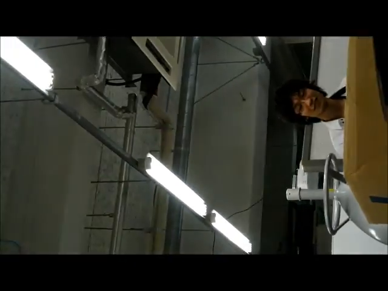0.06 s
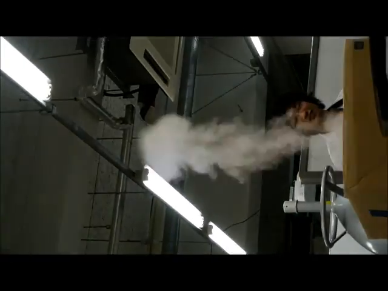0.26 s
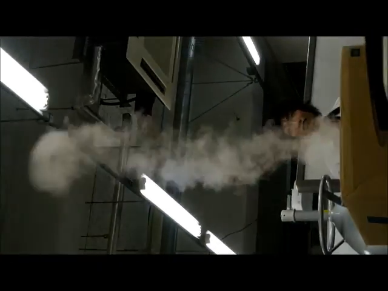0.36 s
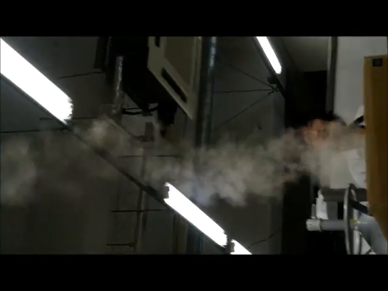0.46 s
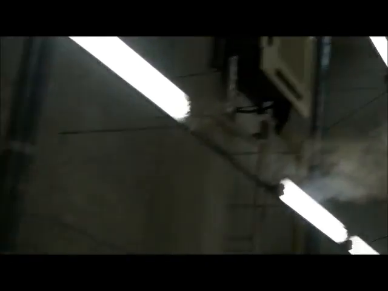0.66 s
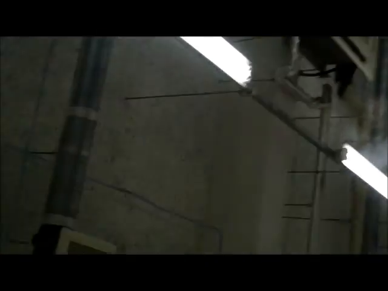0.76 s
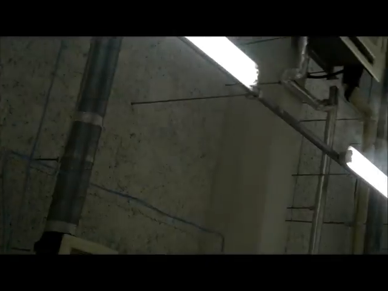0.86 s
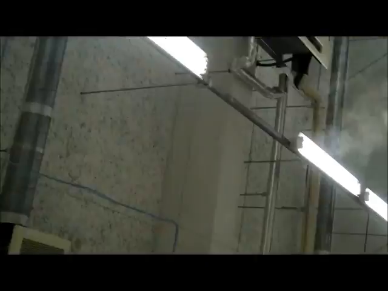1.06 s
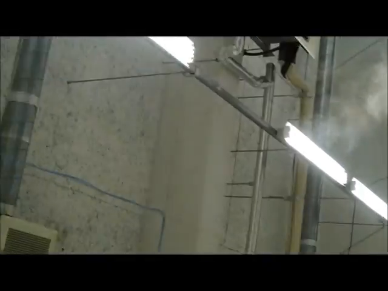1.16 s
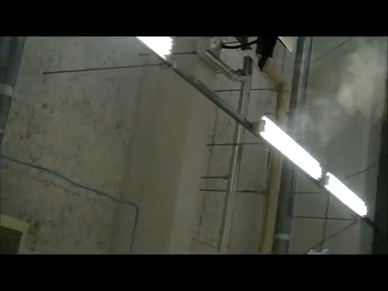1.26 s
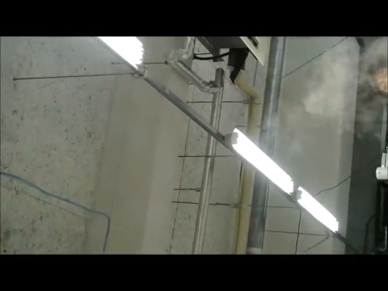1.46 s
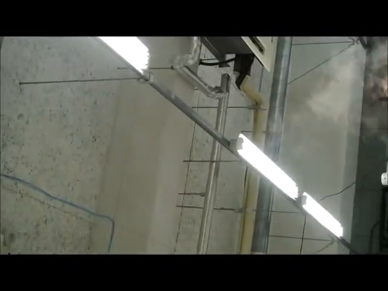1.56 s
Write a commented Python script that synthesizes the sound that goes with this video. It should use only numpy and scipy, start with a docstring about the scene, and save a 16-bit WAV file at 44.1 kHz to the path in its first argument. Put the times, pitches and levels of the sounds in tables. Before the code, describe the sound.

One violent, distorted air blast booms in a concrete workshop, then faint ticks and debris rattles

```python
"""Ventilation hums and hisses throughout a workshop, made from coloured noise; an early hiss soon fades.
An air cannon fires a puff of smoke close to a microphone whose input clips: air spits from the muzzle as
noise bursts and the barrel thumps as short sine waves. The hall rings as fading noise, with its low reverberation
drawn as one uneven tone. A small thing ticks, a few short sine waves at a time, then light debris rattles down
in bright noise bursts. A thin high hiss swells near the end."""
import sys
import numpy as np
from scipy import signal
from scipy.fft import rfft, irfft, next_fast_len
from scipy.io import wavfile
from scipy.ndimage import uniform_filter1d

SR = 44100
rng = np.random.default_rng(int(sys.argv[2]) if len(sys.argv) > 2 else 0)


def transcribe(signal):
    """Save signal, clipped to [-1, 1], as a 16-bit WAV file at the path in sys.argv[1]."""
    frames = np.atleast_2d(signal).T
    limited = np.clip(frames, -1, 1)
    pcm = np.round(limited * 32767).astype(np.int16)
    wavfile.write(sys.argv[1], SR, pcm)


N = 70560  # length in samples

# How alike left and right are for sounds close by: pitch_hz [Hz], likeness [-1 to 1]
NEAR_ALIKE = [(400, 0.69), (1290, 0.89), (2380, 0.35), (4400, -0.082), (8120, -0.54), (15000, 0.11)]
TAIL_START_S = 0.23  # the hall starts to answer
PATCHES_DB = 1.3  # rms unevenness of the fading room sound


def amp(db):
    """Turn decibels into a gain."""
    return 10 ** (np.asarray(db) / 20)


def unit(x):
    """Scale a sound to an rms (average strength) of 1."""
    return x / np.sqrt(np.mean(np.abs(x) ** 2) + 1e-20)


def along(points, hz):
    """Read a curve of (Hz, value) points, with pitch on a log scale."""
    f, v = np.transpose(points)
    return np.interp(np.log(hz + 1), np.log(f + 1), v)


def since(start_s):
    """Seconds since start_s (0 before it), and a switch that is on from then."""
    t = np.arange(N) / SR - start_s
    return np.maximum(t, 0), t >= 0


def level_over_time(points):
    """Gain at every sample from (s, dB) points."""
    return amp(np.interp(np.arange(N) / SR, *np.transpose(points)))


def filtered(x, response):
    """Shape the frequencies of x with a gain that depends on Hz."""
    m = next_fast_len(N + SR // 2)  # spare room so that the end does not wrap round to the start
    return irfft(rfft(x, m) * response(np.fft.rfftfreq(m, 1 / SR)), m)[..., :N]


def bands(peaks):
    """Gain of a set of resonances, each letting through a band around its own pitch."""
    def response(f):
        total = 0
        for k, (center, width, db) in enumerate(peaks):
            resonance = 1j * f * width / (center * center - f * f + 1j * f * width)
            total = total + (-1) ** k * amp(db) * resonance
        return total
    return response


def diffuse(response, alike=None):
    """Coloured stereo noise of rms 1: a shared middle and an opposite side set how alike the ears are."""
    # Usual left-right likeness, strong in the bass and weak in the treble: pitch_hz [Hz], likeness [-1 to 1]
    usual_alike = [(60, 0.83), (200, 0.87), (640, 0.64), (1400, 0.38), (3000, 0.057), (6500, -0.063),
                   (15000, 0.16)]
    if alike is None:
        alike = usual_alike

    def middle_and_side(hz):
        turn = np.arccos(np.clip(along(alike, hz), -1, 1)) / 2
        return response(hz) * [np.cos(turn), np.sin(turn)]

    mid, side = filtered(rng.standard_normal((2, N)), middle_and_side)
    return unit(np.array([mid + side, mid - side]))


def dying(x, start_s, share, patchy_db):
    """Fade each frequency of x at a share of the hall's fading time, in patches of random gain."""
    # The hall's time to fade by 60 dB, before the share: pitch_hz [Hz], t60_s [s]
    hall_t60 = [(100, 1.73), (400, 0.93), (1000, 1.006), (3000, 0.99), (6000, 0.87), (10000, 0.76),
                (15000, 0.56)]
    hz, t, z = signal.stft(x, SR, nperseg=256)
    fade_db = -60 * np.maximum(t - start_s, 0) / (share * along(hall_t60, hz)[:, None])
    field = rng.standard_normal(fade_db.shape)
    field = uniform_filter1d(field, size=12, axis=0)  # smooth across pitch
    field = uniform_filter1d(field, size=3, axis=1)  # smooth across time
    return signal.istft(z * amp(fade_db + patchy_db * unit(field)), SR, nperseg=256)[1][:, :N]


def ventilation():
    """Moving air makes broad noise; the fans hum as noise squeezed into narrow bands."""
    # Colour of the air noise: pitch_hz [Hz], relative level_db [dB per Hz]
    air_colour = [(25, 5), (50, 12.5), (80, 4.5), (129, -8), (210, -1.5), (291, -11.5), (400, -7.5),
                  (635, -10.5), (1150, -11.5), (2200, -14), (4300, -15), (8000, -16), (11500, -17),
                  (14000, -17), (15800, -24)]
    # Bands of the fans: pitch_hz [Hz], width_hz [Hz], relative level_db [dB]
    fan_bands = [(258, 32, -11), (418.5, 27, -15), (688, 8.6, -9.5)]
    air = diffuse(lambda hz: amp(along(air_colour, hz)))
    hum = diffuse(bands(fan_bands))
    return amp(-43) * air + amp(-53) * hum


def fading_hiss():
    """Coloured noise that dies away early, with a slight rise on the way."""
    # Level of the hiss: time_s [s], level_db [dB]
    hiss_level = [(0, -41.5), (.05, -48.5), (.1, -57), (.2, -53.5), (.5, -70)]
    # Colour of the hiss: pitch_hz [Hz], relative level_db [dB per Hz]
    hiss_colour = [(1000, -9), (4000, -6.5), (7000, 2.5), (9500, 2), (12500, -2), (14000, -24),
                   (15800, -36)]
    return level_over_time(hiss_level) * diffuse(lambda hz: amp(along(hiss_colour, hz)))


def muzzle_spits():
    """Turbulent air bursts out of the muzzle: noise that starts at once and fades."""
    # Air bursts: start_s [s], level_db [dB], t60_s (time to fade by 60 dB) [s], treble_lift_db [dB]
    air_bursts = [(0.2186, -20.5, 0.0097, 3), (0.2208, -1.5, 0.05, 2.5), (0.2234, 10, 0.018, -4.5),
                  (0.2264, -4, 0.0022, -5), (0.2298, -2.5, 0.019, 14), (0.2304, -1.5, 0.0098, 2.5),
                  (0.234, -16.5, 0.036, 6), (.2505, -12, 0.047, 40), (0.261, -25, 0.0095, 5)]
    # Colour before the treble lift: pitch_hz [Hz], relative level_db [dB per Hz]
    spit_colour = [(200, 5.5), (600, -36), (1500, -1), (2600, -1), (4000, -19), (8000, -18), (15000, -17)]
    out = np.zeros((2, N))
    for start_s, db, t60, lift_db in air_bursts:
        t, _ = since(start_s)
        air = diffuse(lambda hz: amp(along(spit_colour, hz) + lift_db * (hz > 4000)), NEAR_ALIKE)
        out += air * amp(db - 60 * t / t60) * np.minimum(t / 0.00015, 1)
    return out


def barrel_thump():
    """The air column in the barrel swings a few times, while its higher modes ring and fade."""
    # Swings, direct and off a wall: start_s [s], pitch_hz [Hz], level_db before sag and edges [dB], length_s [s]
    swings = [(.2206, 220, 14, .0112), (.2377, 192, 0, .016)]
    # Higher modes of the barrel: pitch_hz [Hz], level_db [dB], t60_s [s]
    barrel_modes = [(375, 1, 0.048), (577, -3, 0.048), (830, -14.5, 0.056), (948, -6.5, 0.039)]
    sag_db = 12.5  # loss over one swing's length
    rise_s, release_s = 0.0023, 0.0014
    out = np.zeros(N)
    for start_s, hz, db, length in swings:
        t, on = since(start_s)
        edge = np.clip((length - t) / release_s, 0, 1) * np.minimum(t / rise_s, 1)
        out -= on * edge * amp(db - sag_db * t / length) * np.sin(2 * np.pi * hz * t)
    t, _ = since(swings[0][0])
    for hz, db, t60 in barrel_modes:
        out -= amp(db - 60 * t / t60) * np.sin(2 * np.pi * hz * t)
    return out


def hall_tail():
    """The hall answers the shot with wide noise whose pitches fade at different speeds, in patches."""
    # Colour of the hall's answer: pitch_hz [Hz], relative level_db [dB per Hz]
    tail_colour = [(40, -12), (100, -15.5), (150, -11.5), (230, -2.5), (300, -16.5), (380, -10), (500, -20),
                   (700, -14.5), (1000, -18), (1500, -21), (2800, -23), (3900, -26), (8000, -24.5),
                   (13500, -23), (15800, -27)]
    # Level over the plain fade: time_s [s], level_db [dB]
    tail_swell = [(.232, 5), (.262, -2), (.36, 0), (.44, 3), (.53, 3), (.57, -1.5), (.7, 1)]
    t, _ = since(TAIL_START_S)
    noise = diffuse(lambda hz: amp(along(tail_colour, hz)))
    tail = dying(noise, TAIL_START_S, 0.93, PATCHES_DB)
    tail = tail * (1 - np.exp(-t / 0.0039))  # soft start
    return amp(-17.5) * level_over_time(tail_swell) * tail


def low_reverberation():
    """The hall's low reverberation: one uneven tone on set pitch and level curves, and fading room modes."""
    # Curves of the tone, around 190-245 Hz: time_s [s], pitch_hz [Hz], level_db before the left-right tilt [dB]
    tone_curves = [(.258, 218, -41), (.288, 225.5, -30), (0.304, 214.8, -33), (.32, 204.4, -21.5),
                   (.335, 214.6, -35), (.352, 228.2, -21), (.372, 205.5, -33), (.39, 192, -27),
                   (.42, 190.4, -27), (.44, 206, -15.5), (0.456, 210.4, -35), (.467, 214, -26),
                   (0.491, 235, -37.5), (0.521, 245, -24.5), (.54, 195, -33), (.56, 191, -38),
                   (.6, 203.8, -34.5), (.625, 225.5, -48), (.648, 228.2, -31), (.67, 232, -55)]
    # Modes around the tone: pitch_hz [Hz], level_db before the left-right tilt [dB], t60_s [s]
    room_modes = [(130.2, -35.5, 1.46), (153.7, -35.5, 1.27), (283, -30.5, 1.16), (351, -37, .8),
                  (563, -37, 0.7)]
    rough_share, spread_hz = 0.3, 60  # neighbouring modes
    t, on = since(TAIL_START_S)
    clock = np.arange(N) / SR
    s, hz, db = np.transpose(tone_curves)
    level_db = np.interp(clock, np.r_[s[0] - .012, s, s[-1] + .1], np.r_[-60, db, -70])
    slow_noise = filtered(rng.standard_normal((2, N)), lambda f: np.exp(-(f / spread_hz) ** 2))
    a, b = rough_share * unit(slow_noise)
    turn = 2 * np.pi * np.cumsum(np.interp(clock, s, hz)) / SR
    tone = unit((1 + a) * np.sin(turn) + b * np.cos(turn))
    modes = np.zeros(N)
    for f, mode_db, t60 in room_modes:
        modes += amp(mode_db - 60 * t / t60) * np.sin(2 * np.pi * (f * t + rng.random()))
    tilt = amp([[-.6], [.6]])  # right a little louder
    return (on * amp(level_db) * tone + modes * np.minimum(t / 0.047, 1)) * tilt


def ticks():
    """Small dry knocks of a hard object: a few of its modes ring as quickly fading sine waves."""
    # Knocks: start_s [s], level_db before trim and lift [dB], treble_lift_db [dB per octave from 750 Hz]
    knocks = [(0.7031, -24, 5), (0.7341, -27, 1.5), (0.7415, -29.5, -5), (0.7455, -29, -14),
              (.7715, -35, -6)]
    # Modes of the object: pitch_hz [Hz], relative level_db [dB], t60_s [s]
    object_modes = [(792, 6, 0.0082), (1291, -5.5, 0.022), (2170, -2, 0.0072), (3380, -7, 0.0042),
                    (5830, -15, 0.0053)]
    trim_db = -7.5
    out = np.zeros(N)
    for start_s, db, lift_db in knocks:
        t, on = since(start_s)
        for k, (hz, mode_db, t60) in enumerate(object_modes):
            level_db = db + trim_db + mode_db + lift_db * np.log2(hz / 750)
            out += on * amp(level_db - 60 * t / t60) * (-1) ** k * np.sin(2 * np.pi * hz * t)
    return out


def rattles():
    """Light debris gives short bright noise bursts around a high ring, each with its own wash of room."""
    # Bursts: start_s [s], level_db before tilt [dB], length_s before the fade [s], ring_hz [Hz],
    # broad_db (broad part against the ring) [dB], low_lift_db (broad part below the knee) [dB]
    debris_bursts = [(0.9493, -27, 0.0031, 12800, -13, 1), (0.9514, -22.5, 0.0022, 12900, -12, 2.5),
                     (0.955, -22, 0.0036, 12600, -5, -4), (0.967, -22, 0.0019, 12800, -4, 0),
                     (0.9705, -20, 0.0022, 13100, -10, 0), (0.9743, -20.5, 0.0063, 12750, -14, -0.5),
                     (0.981, -31, 0.0087, 13500, 9, 0), (0.995, -28, 0.003, 13300, -8, -4),
                     (1.039, -28.5, .0019, 12700, -5, -2), (1.1034, -15.5, 0.0026, 13000, -12.5, -5.5),
                     (1.106, -23, .0022, 13200, -6, -6), (1.111, -30, 0.0043, 12500, 0, -1.5),
                     (1.124, -33, 0.0027, 12700, 1, 1), (1.1348, -19, 0.0032, 12950, -8, -2),
                     (1.1405, -33, 0.0026, 12800, 2, 3), (1.159, -33, .003, 12600, -7, 6),
                     (1.2983, -20, 0.0022, 14200, 2, -9), (1.301, -26, 0.0044, 13640, -8.5, 1),
                     (1.305, -31, 0.0094, 13700, 6, 1), (1.32, -31, 0.0018, 13700, -8, 4)]
    # Colour of the broad part: pitch_hz [Hz], relative level_db [dB per Hz]
    broad_colour = [(700, -12.5), (1200, -11), (2500, -6.5), (4600, -5), (5600, 0.5), (8000, -0.5),
                    (11000, -2), (15800, -2)]
    knee_hz, ring_width_hz = 5030, 1000
    fade_t60_s = 0.008
    wet_db, wet_ring_db = -12.5, -21.5  # the room's wash, and the ring within it
    room_share = 0.56  # share of the hall's fading time
    out = np.zeros((2, N))
    for start_s, db, length, ring_hz, broad_db, low_db in debris_bursts:
        t, _ = since(start_s)

        def colour(ring_db):
            def response(hz):
                broad = amp(along(broad_colour, hz) + broad_db + low_db * (hz < knee_hz))
                ring = amp(ring_db) * np.exp(-((hz - ring_hz) / ring_width_hz) ** 2)
                return broad + ring
            return response

        fade_db = -60 * np.maximum(t - length, 0) / fade_t60_s
        shape = np.minimum(t / 0.00055, 1) * amp(db + fade_db)
        out += shape * diffuse(colour(0), NEAR_ALIKE) * amp([[-.7], [.7]])  # right a little louder
        wash_db = db + wet_db + 10 * np.log10(length / 0.0035)  # longer bursts stir the room more
        wash = dying(diffuse(colour(wet_ring_db)), start_s, room_share, PATCHES_DB)
        out += amp(wash_db) * np.minimum(t / 0.0061, 1) * wash
    return out


def thin_hiss():
    """Noise in a high band, very faint at first and swelling late."""
    # Level of the thin hiss: time_s [s], level_db [dB]
    thin_level = [(1.3, -68), (1.44, -53), (1.48, -47.5), (1.54, -44), (1.6, -45)]
    center_hz, width_hz = 11800, 3300
    noise = diffuse(lambda hz: np.exp(-((hz - center_hz) / width_hz) ** 2))
    return level_over_time(thin_level) * noise


def scene():
    """All sources in the workshop added together."""
    background = ventilation() + fading_hiss()
    shot = muzzle_spits() + barrel_thump()
    hall = hall_tail() + low_reverberation()
    return background + shot + hall + ticks() + rattles() + thin_hiss()


def record(dry):
    """The microphone cuts the deep bass, the input clips, then a further bass cut and a top limit follow."""
    mic_cut_hz, top_hz = 122, 15843
    clip_level, clip_hardness = 0.93, 18  # a higher hardness gives a sharper corner

    def low_cut(hz, edge_hz):
        return -hz * hz / (edge_hz ** 2 - hz * hz + 1.4j * hz * edge_hz)

    def after_clipping(hz):
        dip = 1 - .7 * np.exp(-((hz - 78) / 22) ** 2)  # weaker around 78 Hz
        return (hz < top_hz) * np.abs(low_cut(hz, 50)) * dip

    heard = filtered(dry, lambda hz: low_cut(hz, mic_cut_hz))
    clipped = heard / (1 + np.abs(heard / clip_level) ** clip_hardness) ** (1 / clip_hardness)
    return filtered(clipped, after_clipping)


dry = scene()
out = record(dry)
transcribe(out)
```